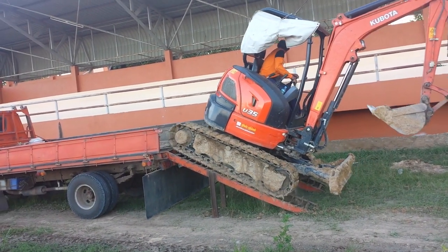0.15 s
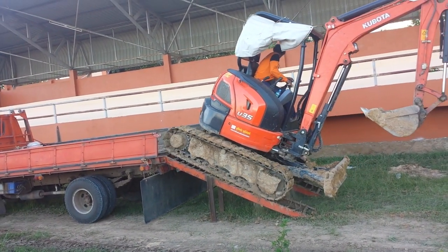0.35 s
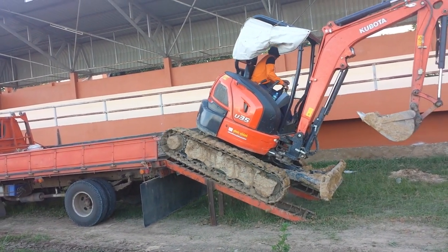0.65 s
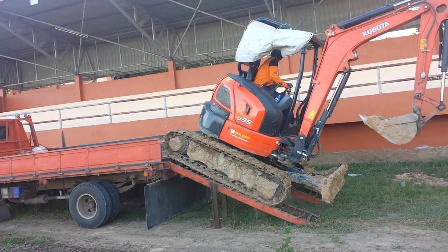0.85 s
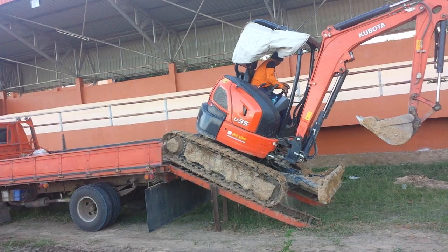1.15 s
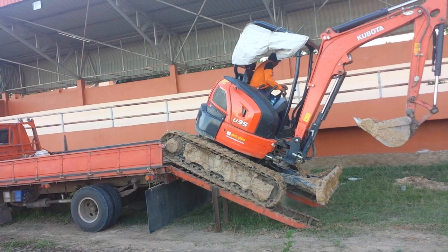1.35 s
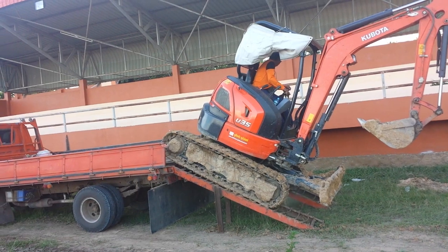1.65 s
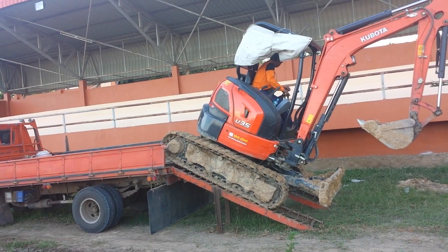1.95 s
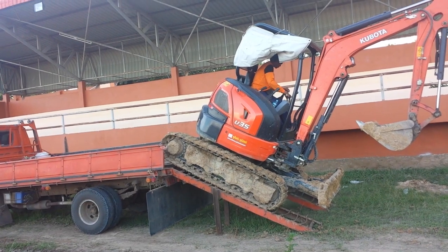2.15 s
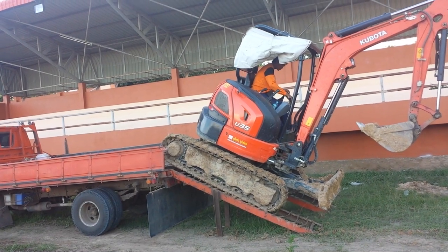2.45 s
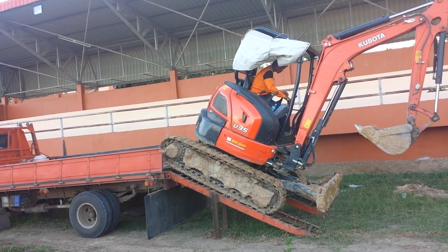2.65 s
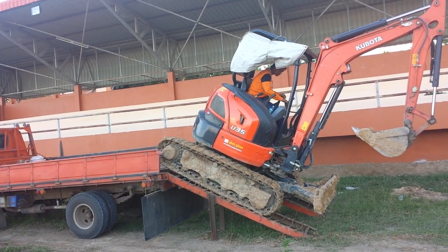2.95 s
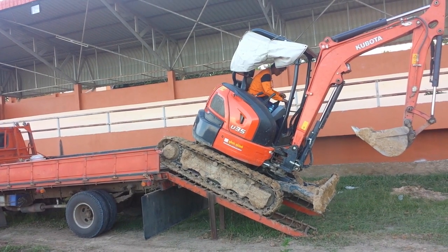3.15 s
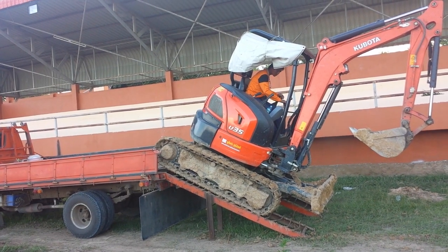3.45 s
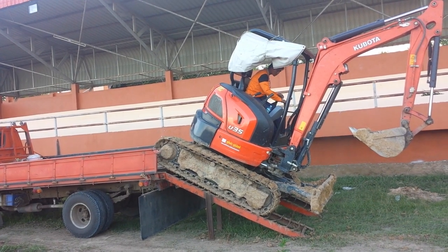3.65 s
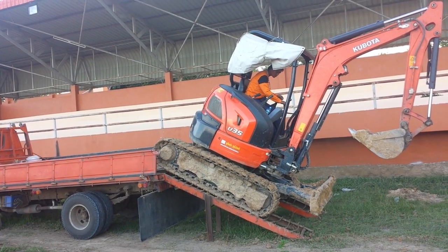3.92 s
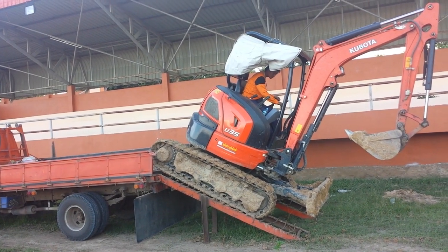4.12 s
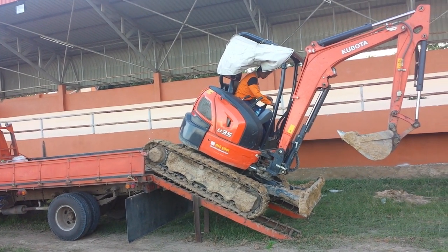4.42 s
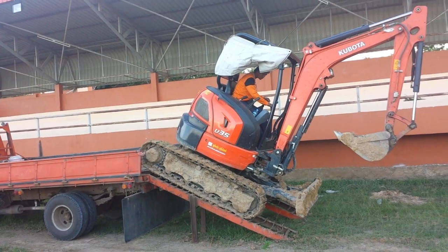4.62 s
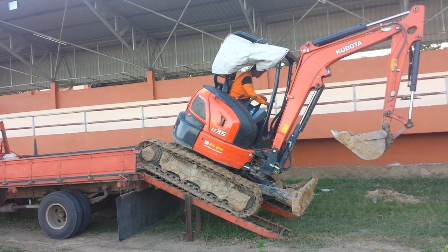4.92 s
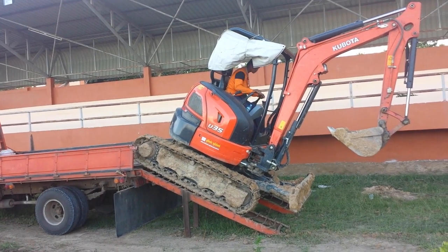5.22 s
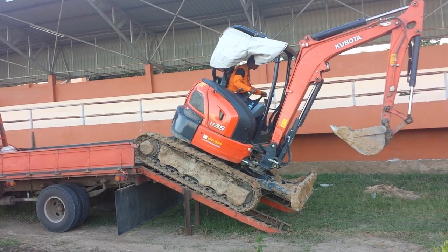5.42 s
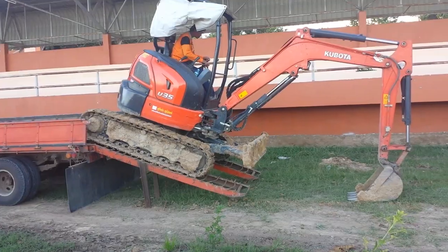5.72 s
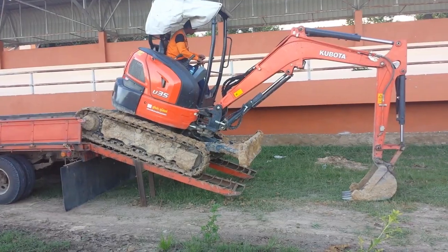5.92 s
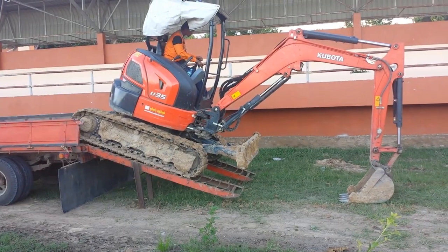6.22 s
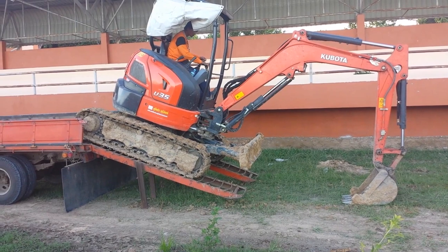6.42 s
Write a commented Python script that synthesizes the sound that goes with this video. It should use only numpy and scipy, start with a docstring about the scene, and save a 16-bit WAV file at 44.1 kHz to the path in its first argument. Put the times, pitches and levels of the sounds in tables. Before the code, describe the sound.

Outdoors, close stereo microphone, dry. From 0 s a small three-cylinder diesel runs fairly quietly, a fast low throb near 55 beats a second with hum, rough roar, fine tapping clatter, hiss and a faint high whine. At about 0.18-0.35 s steel track links strike a ramp in a tight burst, sharp cracks with clanging, ringing metal and a groaning scrape. A second, longer flurry runs 0.7-1.3 s, hardest around 0.83-1.03 s, ending in grinding, singing metal. The engine is alone again by 1.5 s. From about 2.1 to 2.5 s it swells about 10 dB with a slight pitch rise that settles, then drones steadily, its clatter most noticeable around 2.6-3.5 s. A low hum briefly swells near 3.95 s; the hiss slowly broadens. At 5.62 s sound stops dead. From 5.97 s the engine fades in over 0.3 s, with another brief hum at 6.2 s, continuing to 6.57 s.

```python
"""A small three-cylinder diesel excavator climbs a steel ramp outdoors, heard at two close microphone ports.
The engine is a stack of cycle harmonics under throbbing roar and hiss noise, with a clatter of noise bursts;
its drone is heard to swell and then run steadily. Early on the steel track clanks and grinds on the ramp:
damped rings and noise, with singing modes for the ramp.
The sound stops dead for a third of a second and fades in again."""
import sys
import numpy as np
from scipy import signal
from scipy.fft import rfft, irfft, next_fast_len
from scipy.io import wavfile
from scipy.ndimage import uniform_filter1d, map_coordinates

SR = 44100
rng = np.random.default_rng(int(sys.argv[2]) if len(sys.argv) > 2 else 0)


def wav_out(sig):
    """Save sig, one row per channel (or a flat mono array), as 16-bit PCM at SR to the path in sys.argv[1]."""
    wavfile.write(sys.argv[1], SR, np.round(np.clip(np.atleast_2d(sig).T, -1, 1) * 32767).astype(np.int16))


N = 289737
STOP_S, RESUME_S, FADE_S = 5.62, 5.974, 0.29


def amp(db):
    """dB to gain."""
    return 10 ** (np.asarray(db) / 20)


def unit(x):
    """x at rms 1."""
    return x / np.sqrt(np.mean(x ** 2) + 1e-20)


def along(points, hz):
    """Read (frequency_hz, value) points on a log frequency axis."""
    f, v = np.transpose(points)
    return np.interp(np.log(hz + 1), np.log(f + 1), v)


def curves(table):
    """One automation curve, a value per sample, for each column after the time."""
    s, *columns = np.transpose(table)
    return [np.interp(np.arange(N) / SR, s, column) for column in columns]


def wobble(rate):
    """A smooth random curve, rate knots a second."""
    knots = rng.standard_normal(int(N * rate / SR) + 4)
    return map_coordinates(knots, [np.arange(N) * rate / SR])


def filtered(x, response):
    """x shaped by a complex response of frequency."""
    m = next_fast_len(N + SR // 2)
    return irfft(rfft(x, m) * response(np.fft.rfftfreq(m, 1 / SR)), m)[..., :N]


def colour(spectrum):
    """The gain curve of a (frequency_hz, level_db) spectrum."""
    return lambda hz: amp(along(spectrum, hz))


def modes(table):
    """Causal resonances, each applied twice so that the valleys stay dark."""
    def response(hz):
        total = 0
        for centre, width, db in table:
            once = 1j * hz * width / (centre * centre - hz * hz + 1j * hz * width)
            total = total + amp(db) * once ** 2
        return total
    return response


def rush(response, patchy_db):
    """Noise for the direct and the scattered path, rms 1, with patches of random gain."""
    z = signal.stft(rng.standard_normal((2, N)), nperseg=512)[2]
    field = uniform_filter1d(rng.standard_normal(z.shape[1:]), 6, 0)  # smooth over frequency
    field = uniform_filter1d(field, 10, 1)  # and over time
    noise = signal.istft(z * amp(patchy_db * unit(field)), nperseg=512)[1][:, :N]
    return unit(filtered(noise, response))


# four-stroke cycle at idle, under load and after the stop
IDLE_HZ, LOAD_HZ, LATER_HZ = 18.45, 18.34, 18.24
SURGE_S, SURGE_RISE_S, SURGE_HZ = 2.21, .5, .52


def cycle_hz():
    """Engine cycle rate: idle, one surge that peaks and settles, then a steady rate under load."""
    t = np.arange(N) / SR
    u = np.clip(t - SURGE_S, 0, None) / SURGE_RISE_S
    to_load = LOAD_HZ + (IDLE_HZ - LOAD_HZ) * np.exp(-u)
    steady = np.where(t < STOP_S, to_load, LATER_HZ)
    return steady + SURGE_HZ * (u * np.exp(1 - u)) ** 2


# loudness of the engine as heard: time_s, roar_db
HEARD_LOUDNESS = [(0, -27), (.25, -30.5), (.55, -29.5), (1.05, -31), (1.4, -32.5), (1.9, -31.5), (2.1, -27),
                  (2.3, -22.5), (2.5, -21.5), (4, -21.5), (5.6, -21.5), (6.57, -22.5)]
# how beat, hum, hiss and fizz follow the roar: full_level_db, db_per_roar_db
LAYER_RULES = [(-27.5, 1.35), (-27.5, 1.22), (-30, 1.02), (-42, 1)]
FULL_DB = -22  # the roar at full level


def layers_db():
    """One heard loudness moves all layers: beat, hum, roar, hiss and fizz."""
    roar_db, = curves(HEARD_LOUDNESS)
    beat_db, hum_db, hiss_db, fizz_db = [
        full_db + grows * (roar_db - FULL_DB) for full_db, grows in LAYER_RULES]
    return beat_db, hum_db, roar_db, hiss_db, fizz_db


# multiples of the cycle, in which three cylinders fire: order, level_db (re hum), waver_db
ORDERS = [(6, -9, 2), (9, -20, 3), (10, -19, 3), (11, -5, 1.5), (12, -11, 2), (14, -17, 3), (15, -8, 2),
          (16, -9, 2.5), (18, -16, 3), (19, -5, 2), (20, -4, 2), (21, -10, 3), (22, -13, 3), (23, -13, 3),
          (24, -17, 3), (25, -13, 2), (40, -17, 3), (42, -17, 4), (44, -17, 3), (46, -17, 4), (50, -22, 4),
          (94, -25, 3), (100, -25, 4)]
# steady tones, maybe a pump: pitch_hz, level_db (re hum)
PUMP_TONES = [(67.5, -15.5), (135, -7.5)]
# pump whine at order 60: time_s, level_db (sine peak)
PUMP_WHINE = [(0, -46), (1.2, -54), (1.5, -53), (2.0, -51), (2.25, -56), (6.57, -62.5)]
# a low hum swells briefly: centre_s, pitch_hz, level_db (sine peak), half_length_s
HUM_SWELLS = [(3.953, 119.5, -19.5, 0.12), (6.224, 164, -23, 0.16)]


def engine_tones(cycle):
    """Exhaust beat at three firings a cycle, wavering cycle orders, pump tones, whine and brief hum swells."""
    t = np.arange(N) / SR
    beat_db, hum_db, *_ = layers_db()
    tones = amp(beat_db - hum_db + .6 * wobble(9)) * np.sin(3 * cycle)
    for order, db, waver_db in ORDERS:
        phase = order * cycle + .18 * wobble(6) + rng.uniform(0, 7)
        tones += amp(db + waver_db * wobble(7)) * np.sin(phase)
    for hz, db in PUMP_TONES:
        phase = 2 * np.pi * hz * t + rng.uniform(0, 6.5)
        tones += amp(db + 1.5 * wobble(4.5)) * np.sin(phase)
    tones *= amp(hum_db + 3)  # 3 dB turns a sine's rms into its peak
    tones += amp(curves(PUMP_WHINE)[0]) * np.sin(60 * cycle)
    for s, hz, db, half_s in HUM_SWELLS:
        tones += amp(db) * np.exp(-((t - s) / half_s) ** 2) * np.sin(2 * np.pi * hz * t)
    later = 0.6 * np.roll(tones, shift=190)  # the scattered path is longer, in samples
    return np.array([tones, later])


# low noise spectrum: frequency_hz, density_db (relative)
RUMBLE_SPECTRUM = [(15, -22.5), (28, -9.5), (45, 4), (70, 2.5), (110, -23.5), (200, -120)]


def rumble():
    """Very patchy low noise that follows the exhaust beat's level."""
    return amp(layers_db()[0] - 16.5) * rush(colour(RUMBLE_SPECTRUM), patchy_db=4.5)


# roar spectrum: frequency_hz, density_db (relative)
ROAR_SPECTRUM = [(45, -32.5), (80, -10), (125, -6), (170, -7.5), (240, -6.5), (330, -9), (400, -4.5),
                 (460, -7.5), (565, -19.5), (680, -13), (800, -7.5), (1090, -22), (1280, -18.5),
                 (1460, -24), (1900, -20), (2200, -21), (2430, -27.5), (4000, -38), (8800, -120)]
# level of the roar below BASS_HZ: time_s, level_db (over the rest)
ROAR_BASS = [(0, -1), (.9, -5), (1.3, 3), (1.6, -7), (2.4, -7.5), (2.7, -1), (4.6, 1.5), (5.2, -0.5),
             (6.57, -2)]
BASS_HZ = 175


def roar(throb_db):
    """Coloured noise that throbs with the firings, its bass riding a curve of its own."""
    level_db = layers_db()[2] + throb_db + .4 * wobble(8)
    noise = amp(level_db) * rush(colour(ROAR_SPECTRUM), patchy_db=0.3)
    bass = filtered(noise, lambda hz: 1 / (1 + (hz / BASS_HZ) ** 8))
    return noise + (amp(curves(ROAR_BASS)[0]) - 1) * bass


# hiss spectrum: frequency_hz, density_db (relative)
HISS_SPECTRUM = [(1760, -13), (3000, -4.5), (3750, -5.5), (4530, -6.5), (6260, -3), (6930, 1), (7260, -3.5),
                 (8200, -21), (10700, -41), (18000, -120)]
# fizz spectrum: frequency_hz, density_db (relative)
FIZZ_SPECTRUM = [(4820, -28.5), (8200, 3.5), (9930, -3), (10600, 2), (13900, -10), (15500, -28)]
# the top of the hiss broadens: time_s, sheen_db, hiss_db (over its layer rule)
BRIGHTENING = [(1.5, -57, 0), (4.5, -40, -0.5), (5.6, -33.5, -3.5), (5.9, -37, 0.5), (6.57, -34.5, 1)]


def oil_hiss(throb_db):
    """The hiss of oil: two bands of noise, hiss and a higher fizz, that throb gently with the firings."""
    *_, hiss_db, fizz_db = layers_db()
    oil_db = 0.28 * throb_db + 0.35 * wobble(6)
    hiss_db = hiss_db + oil_db + curves(BRIGHTENING)[1]
    hiss = amp(hiss_db) * rush(colour(HISS_SPECTRUM), patchy_db=.7)
    fizz = amp(fizz_db + oil_db) * rush(colour(FIZZ_SPECTRUM), patchy_db=1.2)
    return hiss + fizz


def engine():
    """Tones, rumble, roar and oil hiss; the orders and the throb follow one running cycle."""
    cycle = 2 * np.pi * np.cumsum(cycle_hz()) / SR
    # one cylinder fires harder than the others
    throb_db = .5 * np.cos(cycle) + .4 * np.cos(2 * cycle) + .6 * np.cos(3 * cycle)
    return engine_tones(cycle) + rumble() + roar(throb_db) + oil_hiss(throb_db)


# valve and injector clatter: time_s, level_db (re roar)
CLATTER_LEVEL = [(0, -11.5), (2.1, -12), (2.6, -8.5), (3.5, -9.5), (4.2, -13.5), (6.57, -14.5)]
# the engine block it rings: pitch_hz, width_hz (one pass), level_db (relative)
BLOCK_MODES = [(790, 230, 5), (1756, 200, 1), (1902, 215, 3.5), (2117, 140, -1), (5200, 900, -23.5),
               (7000, 630, -18)]


def clatter():
    """Six uneven taps a cycle, short bursts of noise ringing the block."""
    turns = 6 * np.cumsum(cycle_hz()) / SR
    tap = turns.astype(int)
    size_db = rng.normal(0, 1.5, tap[-1] + 1)[tap] + 3 * (tap % 2)  # every other tap is raised 3 dB
    decay_db = 25 * (turns - tap)
    bursts = amp(size_db - decay_db) * rng.standard_normal((2, N))
    level_db = layers_db()[2] + curves(CLATTER_LEVEL)[0]
    return amp(level_db) * unit(filtered(bursts, modes(BLOCK_MODES)))


# bands of the sheen: pitch_hz, width_hz (one pass), level_db (relative)
SHEEN_BANDS = [(6530, 2500, 9.5), (7540, 430, 4), (9600, 1300, -7)]


def sheen():
    """A wider band of hiss, resonated noise that comes up late."""
    return amp(curves(BRIGHTENING)[0]) * rush(modes(SHEEN_BANDS), patchy_db=1)


# the track dragging over the ramp: start_s, rise_s, hold_s, groan_db, rasp_db, bed_db (before track() trims)
TRACK_DRAGS = [(0.185, 0.014, 0.04, -20.5, -26, -35.5), (0.315, 0.004, 0.012, -37.5, -31.5, -30),
               (0.744, 0.024, 0.0046, -26.5, -37, -29.5), (1.063, 0.0092, 0.0089, -34, -41.5, -25),
               (1.108, 0.074, 0.014, -23, -28, -30), (1.135, 0.036, 0.018, -22, -28.5, -30),
               (1.227, 0.012, 0.02, -25, -31, -24.5), (1.28, 0.012, 0.049, -29.5, -34.5, -27.5)]


def drags():
    """Gains of groan, rasp and bed: each drag steps in 10 dB down, climbs, holds and falls."""
    t = np.arange(N) / SR
    gains = np.zeros((3, N))
    fall_db_per_s = np.c_[[260, 147, 93]]
    for start, rise, hold, *db in TRACK_DRAGS:
        climb_db = 10 * np.clip((t - start) / rise - 1, -1, 0)
        fall_db = np.clip(t - start - rise - hold, 0, None) * fall_db_per_s
        drag = (t > start) * amp(np.c_[db] + climb_db - fall_db)
        gains = np.maximum(gains, drag)
    return gains


def steel(table, wander_db, noise_db):
    """A ramp part kept ringing, rms 1: unsteady modes wander together in pitch at random, over noise in them."""
    bent_s = np.cumsum(1 + .025 * wobble(14)) / SR  # one random bend for all the part's pitches
    sing = np.zeros(N)
    for hz, width, db in table:
        phase = 2 * np.pi * hz * bent_s + 2.7 * wobble(width / 2) + rng.uniform(0, 5.6)
        sing += amp(db + wander_db * wobble(30)) * np.sin(phase)
    return unit(unit(sing) * [[1], [.4]] + amp(noise_db) * rush(modes(table), patchy_db=1))


def struck(t, hz, db, t60, rise):
    """One damped ring: a sine with a soft onset and an exponential decay."""
    return amp(db - 60 * t / t60) * (1 - np.exp(-t / rise)) * np.sin(2 * np.pi * hz * t)


def swell(t, db, t60, rise):
    """The envelope of a ramp part after a blow: an exponential rise and decay."""
    return amp(db - 60 * t / t60) * (1 - np.exp(-t / rise))


# track links hitting the ramp: start_s, crack_db, ping_hz, knock_hz, clang_hz, thump_hz,
# ribs_db, deck_db, frame_db (levels before the trims in track())
LINK_CLANKS = [(0.176, -15, 5200, 1860, 1060, 209, -18.5, -15.5, -18.5),
               (0.198, -24.5, 5330, 2080, 990, 291, -18.5, -14, -27.5),
               (0.2097, -20, 7460, 1720, 845, 222, -10, -21, -27),
               (0.226, -29, 6000, 1857, 1030, 394, -17, -14.5, -38),
               (0.244, -0.5, 7270, 1900, 990, 363, -16.5, -15, -25),
               (0.254, -26, 6510, 1950, 830, 388, -18.5, -16, -40),
               (0.266, -16.5, 6940, 1830, 915, 390, -15.5, -18.5, -37),
               (0.284, -30, 6000, 1815, 900, 390, -24.5, -19, -40),
               (0.3102, -30, 5910, 1846, 880, 257, -12, -10, -25),
               (0.324, -35.5, 4860, 1945, 851, 282, -25.5, -14.5, -32),
               (0.691, -20.5, 5530, 1800, 910, 327, -46, -43, -34),
               (0.7135, -14.5, 6500, 1900, 824, 288, -27, -26, -20),
               (0.7538, -20.5, 5260, 1700, 1020, 384, -23.5, -15.5, -33.5),
               (0.773, -34.5, 6640, 2020, 1110, 391, -23, -12, -8.5),
               (0.8316, -7.5, 5700, 2005, 1080, 336, -11, -13, -24.5),
               (0.851, -12.5, 5970, 1906, 876, 371, -14.5, -10, -9),
               (0.9195, -2.5, 6080, 2030, 1120, 338, -7.5, -10, -30.5),
               (0.9641, -9.5, 6730, 1960, 937, 450, -14, -19, -19.5),
               (0.989, -28, 6500, 1900, 900, 330, -39.5, -42, -43.5),
               (1.0014, -5.5, 7000, 1800, 953, 325, -8.5, -10.5, -34),
               (1.0294, -3.5, 6000, 1650, 988, 296, -7.5, -7.5, -16),
               (1.0707, -29.5, 5890, 1850, 900, 330, -25.5, -29.5, -32),
               (1.088, -36.5, 5900, 1890, 970, 215, -31, -15, -30.5),
               (1.099, -36, 5900, 1890, 978, 260, -31.5, -17, -22),
               (1.1252, -23, 4360, 1532, 1045, 320, -17, -12, -19.5),
               (1.145, -29, 5000, 1526, 970, 316, -18, -14, -24.5),
               (1.174, -28, 6000, 1490, 840, 436, -16, -13, -18.5),
               (1.195, -33.5, 6000, 2148, 856, 452, -25, -12, -22),
               (1.215, -35, 5500, 1900, 797, 363, -22.5, -16, -13.5),
               (1.2407, -16.5, 5230, 1989, 760, 226, -17.5, -14, -21.5),
               (1.255, -31, 5500, 1887, 857, 430, -22, -14, -20.5)]
# crack noise spectrum: frequency_hz, density_db (relative)
CRACK_SPECTRUM = [(1530, -47.5), (2600, 0), (3670, -2.5), (6000, -0.5), (7800, -1.5), (8720, -12.5),
                  (10200, -15), (14500, -32.5), (15500, -42)]
# resonances of the ramp's ribs, the highest part: pitch_hz, width_hz (one pass), level_db (relative)
RIB_MODES = [(1340, 150, -12), (1520, 150, -7), (1700, 160, -3), (1885, 160, -1.5), (2090, 160, -2),
             (2250, 150, -7), (2470, 150, -11)]
# resonances of its deck: pitch_hz, width_hz (one pass), level_db (relative)
DECK_MODES = [(651, 100, -9.5), (798, 100, 0), (861, 98, -0.5), (990, 80, 1), (1064, 110, -3),
              (1194, 110, -4.5)]
# resonances of its frame, the lowest part: pitch_hz, width_hz (one pass), level_db (relative)
FRAME_MODES = [(291, 60, -6.5), (374, 55, -2), (450, 50, 2), (592, 110, -8.5)]
# the truck bed under the ramp: pitch_hz, width_hz (one pass), level_db (relative)
BED_MODES = [(199, 72, -11.5), (267, 67, -12.5)]
CLANK_T60_S = 0.21


def track():
    """Links crack, ping, knock, clang and thump at their own pitches; larger ramp parts swell later; drags grind."""
    crack, rings, ribs, deck, frame = np.zeros((5, N + SR))
    blows = np.zeros((3, N))  # the first contact, a clean tap on each part
    t, t60 = np.arange(SR // 3) / SR, CLANK_T60_S
    for s, crack_db, ping_hz, knock_hz, clang_hz, thump_hz, ribs_db, deck_db, frame_db in LINK_CLANKS:
        start = round(s * SR)
        at = slice(start, start + len(t))
        blows[:, start] = amp([ribs_db + 18.5, deck_db + 20, frame_db + 30.5])
        snap_and_tail = 1.3 * amp(-60 * t / .014) + .5 * amp(-60 * t / t60)
        crack[at] += amp(crack_db - 10) * snap_and_tail
        rings[at] += struck(t, ping_hz, crack_db - 4, t60=.02, rise=.0003)
        rings[at] += struck(t, knock_hz, ribs_db - 2, t60=.034, rise=.0007)
        rings[at] += struck(t, clang_hz, deck_db - 2, t60=.085, rise=.0015)
        rings[at] += struck(t, thump_hz, frame_db, t60=.09, rise=.002)
        ribs[at] += swell(t, ribs_db - 9.5, 0.67 * t60, rise=.00094)
        deck[at] += swell(t, deck_db - 14, 0.8 * t60, rise=.003)
        frame[at] += swell(t, frame_db - 16, 1.5 * t60, rise=.005)
    groan, rasp, bed = drags()
    slips = amp(1.5 * wobble(200))  # the drag stutters a little
    taps = rings[:N]
    for blow, part in zip(blows, [RIB_MODES, DECK_MODES, FRAME_MODES]):
        taps = taps + filtered(blow, modes(part))
    ribs_gain = ribs[:N] + slips * groan * amp(-6)
    deck_gain = deck[:N] + slips * groan * amp(-4)
    return ((crack[:N] + slips * rasp) * rush(colour(CRACK_SPECTRUM), patchy_db=2.5)
            + taps * [[1], [.3]]  # direct, scattered
            + ribs_gain * steel(RIB_MODES, wander_db=3, noise_db=7)
            + deck_gain * steel(DECK_MODES, wander_db=2.5, noise_db=3)
            + frame[:N] * steel(FRAME_MODES, wander_db=1, noise_db=-2)
            + bed * rush(modes(BED_MODES), patchy_db=5.5))


# balance of the two ports: frequency_hz, level_db (left over right)
PORT_TILT = [(60, -5), (130, -2.5), (300, -4), (700, -4.5), (1300, -7), (1700, 1), (2300, 5), (2900, -4),
             (5000, -3), (6200, 3), (7100, -14.5), (9000, -6), (12500, -7), (14000, -16)]
# likeness of the ports for equally strong paths: frequency_hz, likeness (0-1)
PORT_LIKENESS = [(40, .93), (80, .85), (140, .86), (220, .97), (380, .99), (600, .92), (850, .98),
                 (1500, .6), (2000, .85), (3500, .65), (5500, .36), (7500, .52), (12000, .4), (15000, .15)]
# phase by which the left port leads: frequency_hz, lead_rad
PORT_LEAD = [(60, 0), (300, -0.1), (700, 0.53), (1400, -.6), (1700, 0.3), (2500, -2), (3800, -3),
             (5200, -7), (6200, -10.5), (8000, -9.5), (15000, -21.5)]
# a near surface answers in the treble, a row each for left and right: delay_s, level_db
NEAR_ECHO = [(0.0011, -23), (0.001135, -17.5)]


def ports(paths):
    """Direct sound reaches both ports, shaded and shifted by the housing; scattered sound differs between them."""
    side = np.array([[1], [-1]])  # left, right
    delay_s, echo_db = np.transpose(NEAR_ECHO)[..., None]

    def path_gains(hz):
        turn = np.arccos(np.clip(along(PORT_LIKENESS, hz), 0, 1)) / 2
        return np.array([np.cos(turn), np.sin(turn)])

    def port_response(hz):
        shade = amp(side * along(PORT_TILT, hz) / 2)
        shift = np.exp(.5j * side * along(PORT_LEAD, hz))
        treble = 1 / (1 + (1900 / (hz + 1)) ** 4 + (hz / 8500) ** 6)
        echo = amp(echo_db) * np.exp(-2j * np.pi * hz * delay_s) * treble
        return shade * shift * (1 + echo)

    direct, scattered = filtered(paths, path_gains)
    return filtered(direct + side * scattered, port_response)


# the machine moves across the ports: time_s, level_db (left over right)
MACHINE_DRIFT = [(0, 2.5), (1.5, 3), (4, 2.6), (5.6, 2), (5.9, 2.9)]


def scene():
    """Engine and track at the two ports, the balance drifting as the machine moves."""
    pan_db, = curves(MACHINE_DRIFT)
    heard = ports(engine() + clatter() + sheen() + track())
    return heard * amp(np.array([pan_db, -pan_db]) / 2)


TOP_HZ = 15660


def record(dry):
    """Round the highest peaks, stop dead, stay silent, fade in straight from a small step, and limit the band."""
    t = np.arange(N) / SR
    stop = np.clip((STOP_S - t) / .012, 0, 1)
    fade = (t > RESUME_S) * np.clip(0.049 + (t - RESUME_S) / FADE_S, 0, 1)
    rounded = dry / (1 + np.abs(dry / .95) ** 4) ** (1 / 4)
    return filtered(np.maximum(stop, fade) * rounded, lambda hz: hz < TOP_HZ)


dry = scene()
out = record(dry)
wav_out(out)
```